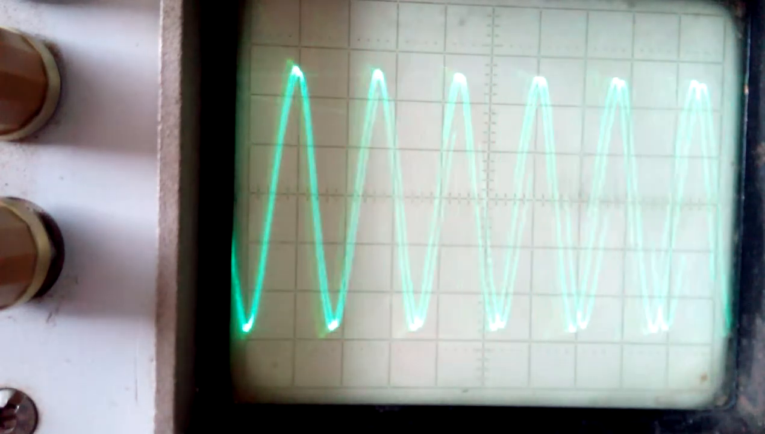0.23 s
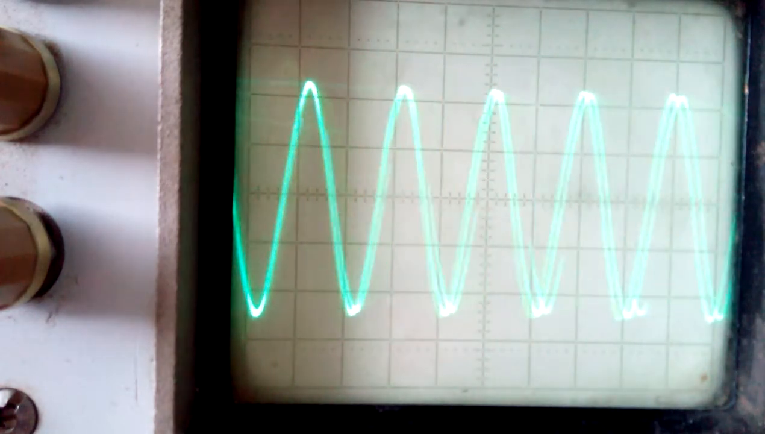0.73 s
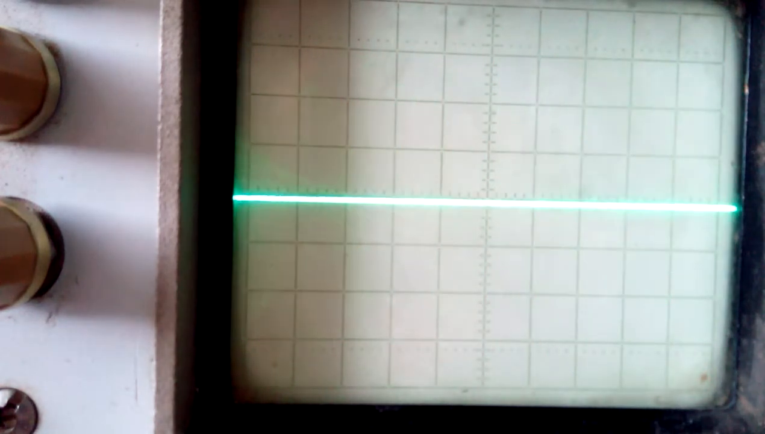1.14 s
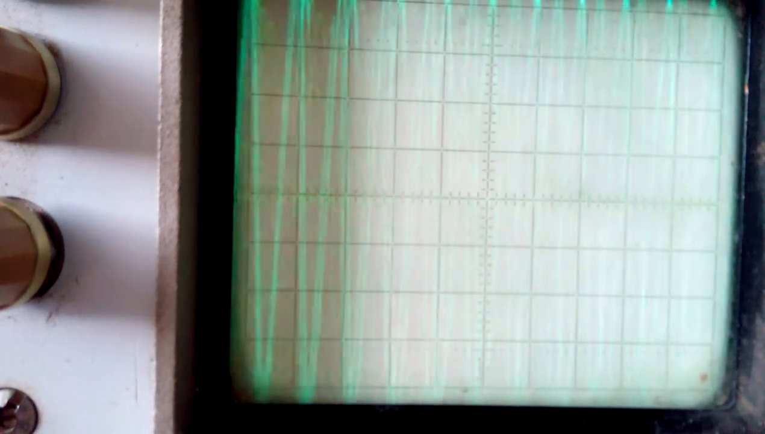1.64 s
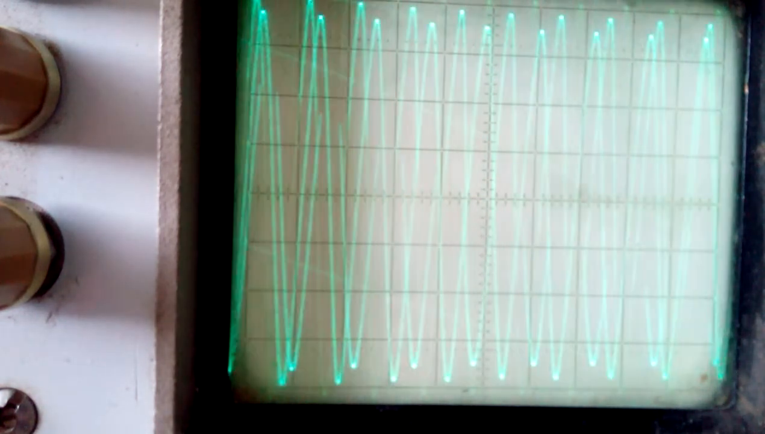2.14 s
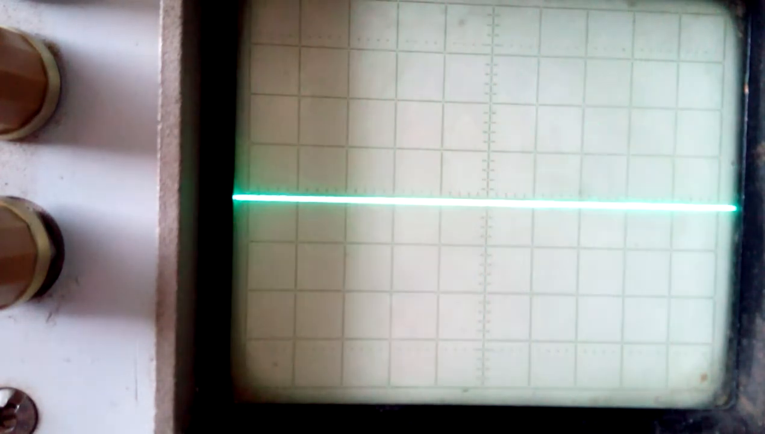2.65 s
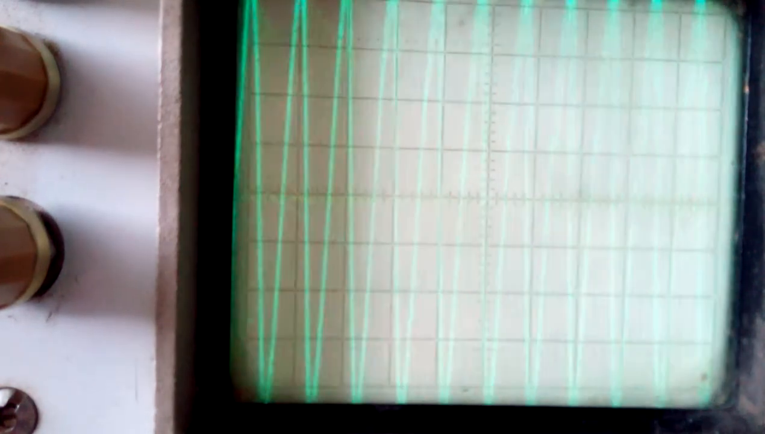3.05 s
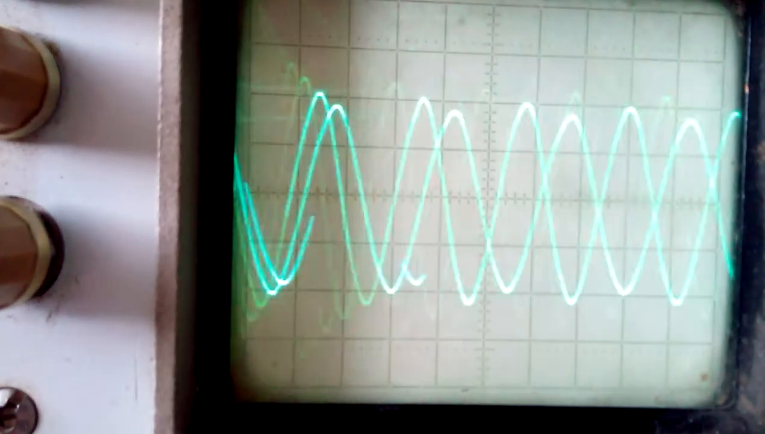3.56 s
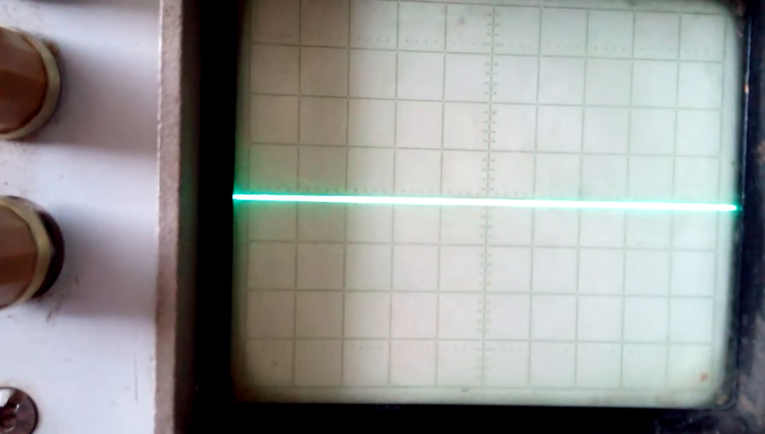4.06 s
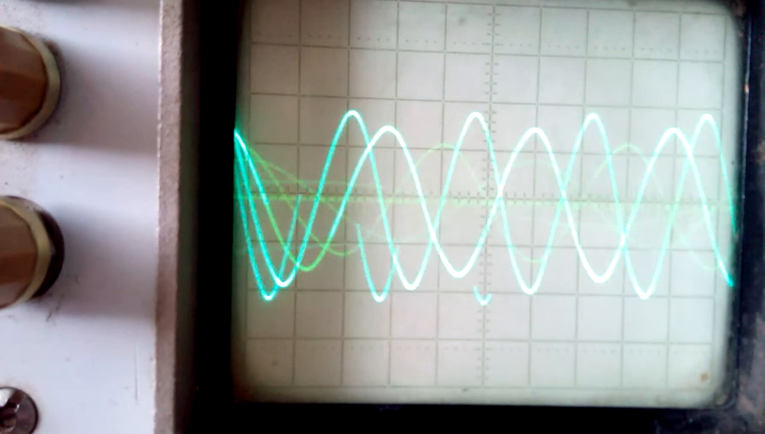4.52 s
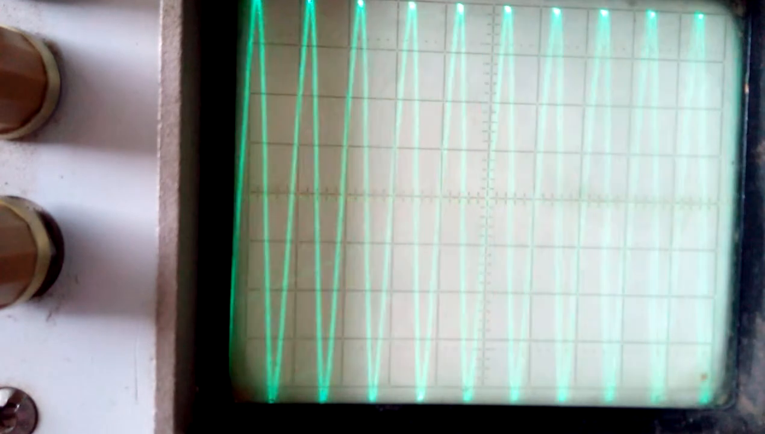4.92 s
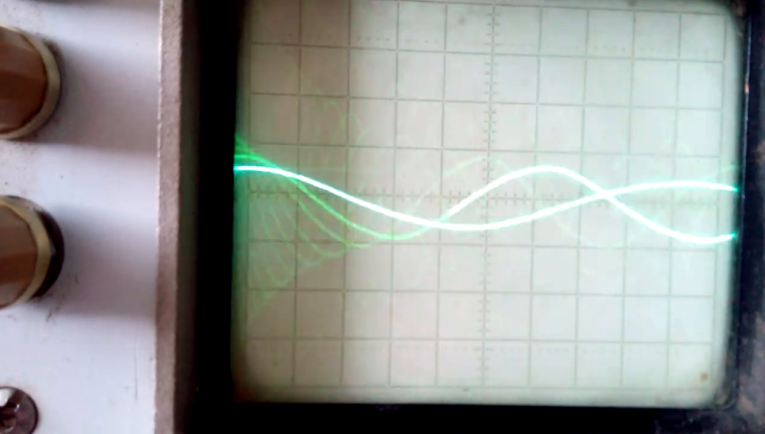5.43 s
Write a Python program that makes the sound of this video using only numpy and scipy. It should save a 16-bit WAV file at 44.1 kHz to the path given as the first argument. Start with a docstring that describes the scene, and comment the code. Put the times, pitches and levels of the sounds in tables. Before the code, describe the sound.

A small electric motor whines up in bursts, squealing and scraping against a generator shaft, with clicks and knocks between.

```python
"""A small hand-held motor rubs on the shaft of a generator: the slipping shafts squeal roughly, scrape
and die away. After a few small clicks the motor spins up, its commutator singing a rising stack over
brush hiss, and is pressed on again; the squeal sags as the pressure is let off, and the motor runs down.
More clicks lead into a second burst with two hard knocks on the bench; a soft knock and a dull tap
come before the third. Under it all lies a quiet room with mains hum and a far-off cricket."""
import sys
import numpy as np
from scipy import signal
from scipy.fft import rfft, irfft, next_fast_len
from scipy.io import wavfile
from scipy.ndimage import uniform_filter1d

SR = 44100
rng = np.random.default_rng(int(sys.argv[2]) if len(sys.argv) > 2 else 0)


def dump(signal):
    """Clip the signal to [-1, 1] and save it as 16-bit WAV at the path in sys.argv[1]."""
    limited = np.clip(np.atleast_2d(signal).T, -1, 1)
    pcm = np.round(limited * 32767).astype(np.int16)
    wavfile.write(sys.argv[1], SR, pcm)


N = 250929
T = np.arange(N) / SR
FFT_SIZE = next_fast_len(N)
BIN_HZ = np.fft.rfftfreq(FFT_SIZE, 1 / SR)


# Grit of the slip, one list a contact, fully rough in between: (time [s], roughness [0-1])
SLIP_GRIT = [
    [(0, .72), (.46, .8)],
    [(1.84, .3), (2.05, .6), (2.2, .6), (2.31, .72)],
    [(2.33, .4), (2.43, .7)],
    [(3.21, .17), (3.6, .22), (3.74, .35), (3.79, .65)],
    [(4.94, .2), (5.48, .16), (5.53, .55), (5.6, .75)],
]

def roughness():
    """How roughly the shafts slip at every sample; they grab and let go within 8 ms."""
    rows = [row for grip in SLIP_GRIT for row in [(grip[0][0] - .008, 1), *grip, (grip[-1][0] + .008, 1)]]
    return np.interp(T, *np.transpose(rows))


def squeal(level_db, hz):
    """Stick-slip of the shafts: a wavering tone when steady, noise around the same pitch when rough."""
    rough = roughness()
    width_hz = 66 + 264 * rough ** 2.7
    tone = np.sqrt(2) * amp(1.3 * drift(hz=30)) * np.sin(phase(hz + .42 * width_hz * drift(hz=45)))
    wide = np.clip((width_hz - 70) / 330, 0, 1)
    chatter = np.sqrt(1 - wide) * fuzz(hz, width_hz=98) + np.sqrt(wide) * fuzz(hz, width_hz=352)
    return amp(level_db) * (np.sqrt(1 - rough) * tone + np.sqrt(rough) * chatter)


# Shafts pressed together, one list a contact:
# (time [s], hiss [dB], treble over hiss [dB], squeal [dB], squeal pitch [Hz])
SHAFT_CONTACTS = [
    [(0.0, -28.5, -8, -26, 1197), (0.262, -29, -9, -25.5, 1215), (0.35, -30, -11, -31.5, 1170),
     (0.404, -29.5, -7, -24.5, 1200), (0.46, -31, -7, -28, 1112), (0.492, -33.5, -11.5, -39, 1145),
     (0.544, -32.5, -10, -32, 1029), (0.585, -36.5, -9, -42, 977), (0.61, -41, -9, -48, 997)],
    [(0.7, -39, -9, -41, 990), (0.74, -41.5, -10, -47, 1230), (0.83, -41.5, -10, -43, 1401),
     (0.935, -38, -10.5, -45, 1374), (1.006, -36, -7, -39, 1220), (1.09, -32.5, -19.5, -41, 1350)],
    [(1.836, -27, -3, -19, 1465), (1.944, -25, -2.5, -17.5, 1557), (2.014, -27.5, -2, -20, 1577),
     (2.096, -27.5, -2, -21, 1546), (2.214, -27.5, -3.5, -20, 1444), (2.294, -28, -9.5, -26.5, 1300),
     (2.312, -25, -12, -22, 1250), (2.32, -29, -5.5, -23, 1470), (2.33, -28.5, -7, -17, 1460),
     (2.416, -31.5, -4, -22, 1400), (2.43, -35.5, -6, -36, 1390)],
    [(3.203, -26, -5, -17.5, 1500), (3.218, -26, -4, -14.5, 1497), (3.236, -28, -1.5, -16.5, 1480),
     (3.294, -27, -2.5, -14.5, 1505), (3.608, -28, -3.5, -20.5, 1480), (3.678, -30, -2, -17, 1500),
     (3.716, -31, -1, -18.5, 1430), (3.765, -31, -4.5, -19.5, 1410), (3.792, -26, -13.5, -32.5, 1046),
     (3.815, -35, -7.5, -47, 846)],
    [(4.938, -26.5, -4.5, -20, 1508), (4.972, -26, -4, -14.5, 1505), (5.028, -27.5, -2, -19.5, 1486),
     (5.16, -28, -2.5, -15, 1440), (5.428, -28.5, -5.5, -19.5, 1430), (5.448, -30, -4, -13, 1430),
     (5.5, -31, -2, -22, 1425), (5.55, -30, -7, -28.5, 1130), (5.612, -33.5, -16, -39.5, 860)],
]
# The motor runs down: (time [s], hiss [dB], decay [dB/s])
RUN_DOWNS = [(1.09, -33, 245), (2.428, -34, 149.5), (3.815, -35.5, 172), (5.612, -36.5, 252)]
# Handling scrapes and rattles:
# (time [s], hiss [dB], decay [dB/s], treble over hiss [dB], squeal over hiss [dB], squeal pitch [Hz])
HANDLING_SCRAPES = [(0.618, -32.5, 128, -9, -1.5, 1000), (0.676, -33.5, 130, -8.5, -4.5, 977),
                    (0.844, -28, 439, -13, -9, 1237), (0.943, -33, 90, -4.5, -3.5, 1320),
                    (1.305, -38.5, 246, -2, -7.5, 998), (1.36, -44.5, 300, -8.5, -14, 1022),
                    (2.752, -43, 299, 4.5, 1, 1350), (2.8, -49.5, 129.5, -3, -8, 1200),
                    (3.175, -22, 171, -14, -11, 1580)]

def motor_envelopes():
    """Hiss, treble, squeal and pitch at every sample, set by the gesture with the loudest hiss."""
    housing_tone = (-3, 1447)  # takes the squeal's place in free running: (over hiss [dB], pitch [Hz])
    gestures = []
    for rows in SHAFT_CONTACTS:
        times, *columns = np.transpose(rows)
        hiss_db, treble_db, squeal_db, hz = (np.interp(T, times, column) for column in columns)
        gestures.append((times[0], times[-1] + .01, hiss_db, treble_db, squeal_db - hiss_db, hz))
    for on, end, rise, easing, db in SPIN_UPS:
        t = np.clip(T - on, 1e-3, end - on)
        hz = rise * t - easing * t ** 2
        swell_db = 17.5 * np.log10(np.maximum(hz - HISS_ONSET_HZ, 1) / (FULL_SPEED_HZ - HISS_ONSET_HZ))
        gestures.append((on, end, db + swell_db, swell_db - 4, *housing_tone))
    for start, db, decay in RUN_DOWNS:
        treble_db = -10 - 70 * (T - start)
        gestures.append((start, T[-1], db - decay * (T - start), treble_db, *housing_tone))
    for start, db, decay, *timbre in HANDLING_SCRAPES:
        gestures.append((start, T[-1], db - decay * (T - start), *timbre))
    envelopes = np.zeros((4, N)) + [[-71.5], [0], [0], [housing_tone[1]]]  # near silence at rest
    for start, end, *values in gestures:
        loudest = (T >= start) & (T <= end) & (values[0] > envelopes[0])
        envelopes = np.where(loudest, np.broadcast_arrays(*values, T)[:4], envelopes)
    hiss_db, treble_db, squeal_over_db, hz = uniform_filter1d(envelopes, size=180, axis=1)
    return hiss_db, treble_db, hiss_db + squeal_over_db, hz


# Broad colour of the hiss: (frequency [Hz], level [dB])
HISS_EQ = [(200, -45), (500, -14), (1000, -9.5), (1900, -0.5), (2150, -3.5), (3200, 3), (4200, -9.5),
           (6500, -14.5), (9000, -18.5), (11500, -25), (16000, -26)]
# Housing resonances on top of it: (frequency [Hz], width [Hz], boost [dB])
HOUSING_PEAKS = [(581, 18, 10), (978, 38, 7), (2396, 86, 9), (2934, 36, 6), (3314, 19, 2.5), (3860, 12, 11),
                 (4690, 61, 5), (5190, 15, 9.5), (6990, 360, 4), (7500, 350, 2.5), (8440, 200, 2)]

def hiss(level_db, treble_db):
    """Brush and rubbing noise through the housing; uneven contact makes it flutter."""
    peaks_db = sum(db / (1 + (2 * (BIN_HZ - hz) / width) ** 2) for hz, width, db in HOUSING_PEAKS)
    rubbing = rng.standard_normal(N) * amp(1.1 * drift(hz=200) + .4 * drift(hz=30))
    spectrum = rfft(shifting_grip(rubbing, depth_db=1.8), FFT_SIZE) * amp(eq(HISS_EQ, BIN_HZ) + peaks_db)
    low, high = (1 / (1 + (BIN_HZ / cutoff_hz) ** 8) for cutoff_hz in (4200, 10000))
    body, treble, fizz = (irfft(spectrum * band, FFT_SIZE)[:N] for band in (low, high - low, 1 - high))
    presence_rms = irfft(spectrum * low * (BIN_HZ > 2100), FFT_SIZE).std()
    touching = np.clip(5 * (1 - roughness()), 0, 1)  # pressing the shafts together lifts the fizz
    top = (treble + amp(4 * touching - 12.5) * fizz) / treble.std()
    return amp(level_db) * (body / presence_rms + amp(treble_db) * top)


def shifting_grip(sound, depth_db):
    """The grip of the hand moves, so narrow overtones come and go about every tenth of a second."""
    frames = signal.stft(sound, nperseg=1024, noverlap=768)[2]
    ripple = rng.standard_normal(frames.shape[::-1]).T
    for _ in range(2):
        ripple = uniform_filter1d(ripple, size=3, axis=0)  # across frequency
        ripple = uniform_filter1d(ripple, size=12, axis=1)  # across time
    return signal.istft(frames * amp(depth_db * unit_rms(ripple)), nperseg=1024, noverlap=768)[1][:N]


# Fuzzy swells in the rubbing:
# (start [s], peak [s], end [s], first pitch [Hz], last pitch [Hz], accent [dB], width [Hz])
OVERTONE_SWELLS = [(0, .03, .34, 3320, 3230, 3, 49.5), (.31, 0.385, .47, 3256, 3250, 5, 50),
                   (.44, 0.542, .6, 2920, 2860, 7, 130), (.615, .64, .73, 2890, 2890, 10, 130),
                   (0.835, .85, .9, 2900, 2820, 3, 200), (.93, 0.96, 1.16, 2880, 3040, 6.5, 199.2),
                   (.48, .536, .59, 793.4, 799, 0, 100), (.6, 0.67, .73, 790, 752, 0, 100),
                   (.95, 1.015, 1.12, 746, 725, -1, 100), (1.84, 1.914, 2.0, 960, 974, -11, 40),
                   (1.84, 1.916, 2.03, 3280, 3520, 3, 100), (2.32, 2.386, 2.44, 2354, 2418, 6.5, 50),
                   (3.206, 3.22, 3.6, 2513, 2370, 3, 50), (3.6, 3.689, 3.79, 2380, 2450, 7, 50.4),
                   (3.5, 3.652, 3.76, 5350, 5430, 1, 299.8), (4.94, 4.994, 5.04, 2410, 2420, 3, 50.3),
                   (0.861, 0.907, .94, 2728, 2720, 7, 119.6), (2.17, 2.231, 2.27, 5570, 5300, -0.5, 250),
                   (3.206, 3.301, 3.4, 7260, 7200, -10, 400), (3.239, 3.339, 3.38, 3335, 3300, 2, 80),
                   (5.361, 5.477, 5.53, 5040, 5200, -0.5, 248), (0.858, .91, .94, 6940, 6770, -5, 150),
                   (1.0, 1.071, 1.13, 6000, 5670, -8.5, 150), (3.77, 3.79, 3.83, 1420, 1404, 2, 90)]

def rubbing_overtones(hiss_db):
    """Rubbing brings out narrow bands that swell from the hiss and sink back, riding its level."""
    track = np.zeros(N)
    for start, peak, end, first_hz, last_hz, accent_db, width_hz in OVERTONE_SWELLS:
        t = np.arange(start, end, 1 / SR)
        swell_db = accent_db + np.interp(t, [start, peak, end], [-12.5, -5, -12.5])
        envelope = amp(np.interp(t, T, hiss_db) + swell_db) * signal.windows.tukey(len(t), .08)
        add(track, start, envelope * fuzz(np.linspace(first_hz, last_hz, len(t)), width_hz))
    return track


# Free-running risers: (start [s], end [s], rise [Hz/s], easing [Hz/s^2], hiss at full speed [dB])
SPIN_UPS = [(1.564, 1.86, 10700, 6, -35), (2.973, 3.22, 11300, 1, -33.5),
            (4.655, 4.95, 12000, 10005, -34.5)]
FULL_SPEED_HZ, HISS_ONSET_HZ = 2500, 440  # commutator rates
# The commutator's stack: (harmonic [number], level [dB])
WHINE_HARMONICS = [(1, 5), (2, 3), (3, 1), (4, -3), (5, -14)]
# How the housing radiates the whine: (frequency [Hz], gain [dB])
WHINE_EQ = [(600, -12), (1300, -3), (1800, 6), (2400, -5), (3500, 5), (4800, -5), (6000, 2), (6800, -2),
            (8000, 4), (9500, -3), (11000, -9), (13000, -22)]

def commutator_whine():
    """The bars pass the brushes ever faster, so the whine climbs in pitch and level."""
    track = np.zeros(N)
    for on, end, rise, easing, hiss_db in SPIN_UPS:
        t = np.linspace(.055, end - on, num=20)
        hz = rise * t - easing * t ** 2
        db = hiss_db - 14.5 + 18 * np.log10(hz / FULL_SPEED_HZ)
        track += glide(on + t, hz, db, WHINE_HARMONICS, WHINE_EQ)
    return track


# Path of the coasting whine: (time [s], fundamental [Hz], level [dB])
COAST_PATH = [(.71, 1205, -61), (.78, 1235, -59), (.84, 1260, -59)]
# Its thin stack: (harmonic [number], level [dB])
COAST_HARMONICS = [(4, 1), (5, 2), (6, -1)]

def coasting_whine():
    """A few faint upper harmonics sing while the motor coasts."""
    return glide(*np.transpose(COAST_PATH), COAST_HARMONICS, WHINE_EQ)


# Low hum under one contact: (time [s], pitch [Hz], level [dB])
UNBALANCE_PATH = [(1.84, 262.4, -60), (2.026, 348.3, -55), (2.076, 360, -47.5), (2.224, 364, -52),
                  (2.26, 290, -47), (2.29, 272.5, -49), (2.3, 280, -66)]

def unbalance_hum():
    """The unbalanced shaft hums at its rate of rotation."""
    return glide(*np.transpose(UNBALANCE_PATH), harmonics=[(1, 0)], colour=[(300, 0)])


# Hits on the bench: (time [s], peak [dB], brightness [dB/octave])
BENCH_HITS = [(3.066, -9.5, -2), (3.17, -3.5, 0.5), (4.054, -34, -10.5)]
# Ring of the bench: (frequency [Hz], level [dB], 60 dB decay time [s])
BENCH_MODES = [(230, -23, .07), (377, -21, .07), (500, -17, .07), (600, -16, .08), (974, -5, .04),
               (1250, -10, .03), (1600, 0, .06), (1790, -9, .07), (2350, -10, .06), (3050, -9, .025),
               (3500, -11, .03), (4150, -13, .025), (4800, -15, .02), (5500, -17, .02), (6100, -21, .02)]

def bench_knocks():
    """The motor knocks the bench, which rings briefly."""
    track = np.zeros(N)
    for start, db, tilt_db in BENCH_HITS:
        add(track, start, strike(BENCH_MODES, db, tilt_db, attack_s=.001))
    return track


# Small clicks and one dull tap: (time [s], peak of the ring [dB], brightness [dB/octave])
CLICKS_AND_TAP = [(0.9405, -14.5, 3), (1.3034, -22, 3), (1.3154, -29, 9), (2.7518, -25.5, -2),
                  (2.76, -30.5, -9), (2.7904, -30, 1), (2.821, -32.5, -5), (4.598, -37, -10)]
# Their tight ring: (frequency [Hz], level [dB], 60 dB decay time [s])
CLICK_MODES = [(1400, -8, .01), (2060, -3, .012), (2500, -3, .02), (3130, 0, .012), (3800, -3, .008),
               (4550, 0, .02), (5300, -3, .008), (6080, -2, .01), (7200, -3, .01), (8300, -6, .008),
               (9400, -11, .006)]

def clicks_and_tap():
    """Each click or tap is a very short crack of noise with a quickly damped ring."""
    track = np.zeros(N)
    crack_decay = np.exp(-T[:400] / .0005)
    for start, db, tilt_db in CLICKS_AND_TAP:
        add(track, start, strike(CLICK_MODES, db, tilt_db, attack_s=.0002))
        add(track, start, amp(db - 15) * rng.standard_normal(400) * crack_decay)
    return track


# Colour of the room tone: (frequency [Hz], level [dB])
ROOM_EQ = [(15, -56), (25, -14), (101, -3.5), (126, -2), (183, -5), (210, -6.5), (290, -5), (369, -10.5),
           (649, -11), (2430, -25.5), (2850, -25), (3180, -26), (15600, -32.5)]
# Mains hum: (frequency [Hz], level [dB])
MAINS_TONES = [(101, -60)]

def room_tone():
    """A dark bed of air and appliance noise with a wavering mains hum."""
    noise = rng.standard_normal(N) * amp(.73 * drift(hz=.38))
    air = irfft(rfft(noise, FFT_SIZE) * amp(eq(ROOM_EQ, BIN_HZ)), FFT_SIZE)[:N]
    hum = sum(amp(db + 1.3 * drift(hz=14)) * np.sin(phase(hz + 2.88 * drift(hz=6.1)))
              for hz, db in MAINS_TONES)
    return amp(-46.5) * unit_rms(air) + np.sqrt(2) * hum


def cricket(pitch_hz=2800, chirps_per_s=17):
    """A far-off cricket: one thin tone pulsed into quick chirps."""
    chirps = np.clip(.43 + np.cos(2 * np.pi * chirps_per_s * (T - .0096)), 0, .8)
    song = unit_rms(chirps * np.sin(phase(pitch_hz + 12 * drift(hz=39.7))))
    return amp(-65 + 2.1 * drift(hz=11)) * song


def glide(times, pitches_hz, levels_db, harmonics, colour):
    """A track of harmonics on a moving rotation rate, wavering in level and pitch."""
    t = np.arange(times[0], times[-1], 1 / SR)
    hz = np.interp(t, times, pitches_hz) * (1 + .005 * drift(hz=80, size=len(t)))
    stack = sum(amp(db + eq(colour, k * hz) + 3 * drift(hz=30, size=len(t))) * np.sin(k * phase(hz))
                for k, db in harmonics)
    envelope = amp(np.interp(t, times, levels_db)) * signal.windows.tukey(len(t), .2)
    track = np.zeros(N)
    add(track, times[0], np.sqrt(2) * envelope * stack)
    return track


def strike(modes, peak_db, tilt_db, attack_s):
    """A blow rings the modes, each at its own phase; tilt_db per octave brightens it."""
    t = T[:6000]
    phases = 2 * np.pi * rng.random(len(modes))
    ring = sum(amp(db + tilt_db * np.log2(hz / 1500) - 60 * t / t60) * np.sin(2 * np.pi * hz * t + offset)
               for (hz, db, t60), offset in zip(modes, phases))
    sound = ring * (1 - np.exp(-(t / attack_s) ** 2))
    return amp(peak_db) * sound / abs(sound).max()


def fuzz(hz, width_hz):
    """Noise of rms 1 around a moving pitch."""
    angle = phase(hz)
    return drift(width_hz, len(hz)) * np.cos(angle) + drift(width_hz, len(hz)) * np.sin(angle)


def drift(hz, size=N):
    """Random wobble of rms 1, rolled off above hz."""
    padded = next_fast_len(size)
    rolloff = 1 + (np.fft.rfftfreq(padded, 1 / SR) / hz) ** 4
    return unit_rms(irfft(rfft(rng.standard_normal(padded)) / rolloff, padded)[:size])


def eq(curve, hz):
    """Gain in dB of an EQ curve, read on a log-frequency axis."""
    points_hz, db = np.transpose(curve)
    return np.interp(np.log(hz + 1), np.log(points_hz + 1), db)


def phase(hz):
    """Phase in radians of a moving frequency."""
    return 2 * np.pi * np.cumsum(hz) / SR


def amp(db):
    return 10 ** (np.asarray(db) / 20)


def unit_rms(x):
    return x / np.sqrt(np.mean(x ** 2) + 1e-20)


def add(track, start_s, sound):
    part = track[round(start_s * SR):][:len(sound)]
    part += sound[:len(part)]


def scene():
    """Everything reaches one microphone, the same on both channels."""
    hiss_db, treble_db, squeal_db, squeal_hz = motor_envelopes()
    mix = hiss(hiss_db, treble_db) + squeal(squeal_db, squeal_hz) + room_tone() + cricket()
    mix += rubbing_overtones(hiss_db) + commutator_whine() + coasting_whine() + unbalance_hum()
    mix += bench_knocks() + clicks_and_tap()
    return np.array([mix, mix])


def record(dry):
    """The microphone drops the deepest bass; a steep high cut trims the very top."""
    low_cut = signal.butter(4, 38, "high", fs=SR, output="sos")
    high_cut = signal.firwin(2047, 15720, window=("kaiser", 9), fs=SR)
    return signal.oaconvolve(signal.sosfilt(low_cut, dry), high_cut[None], "same")


dry = scene()
out = record(dry)
dump(out)
```